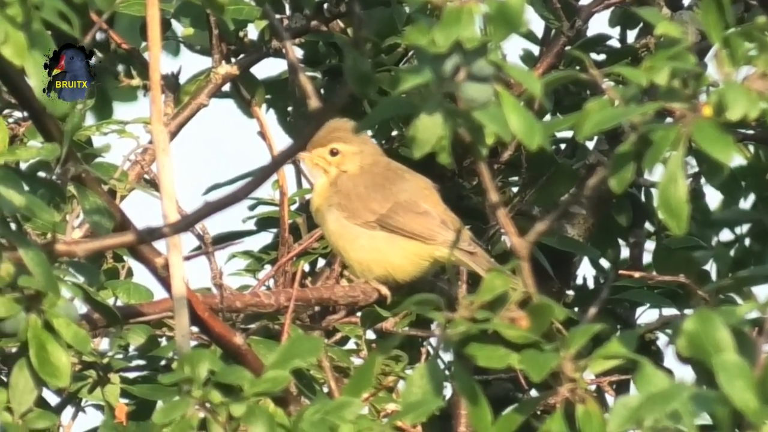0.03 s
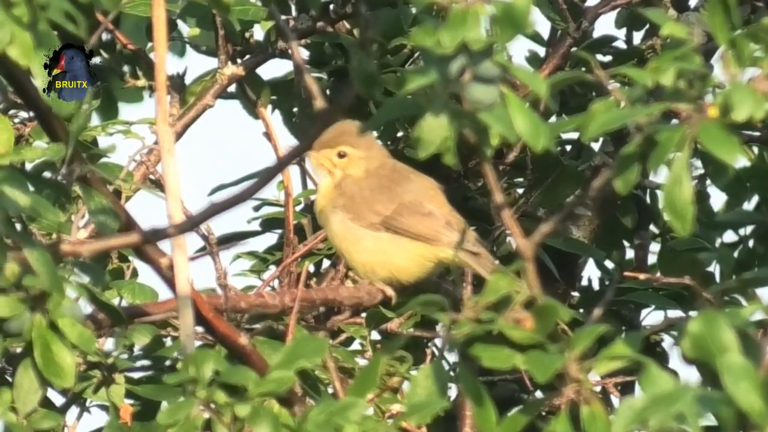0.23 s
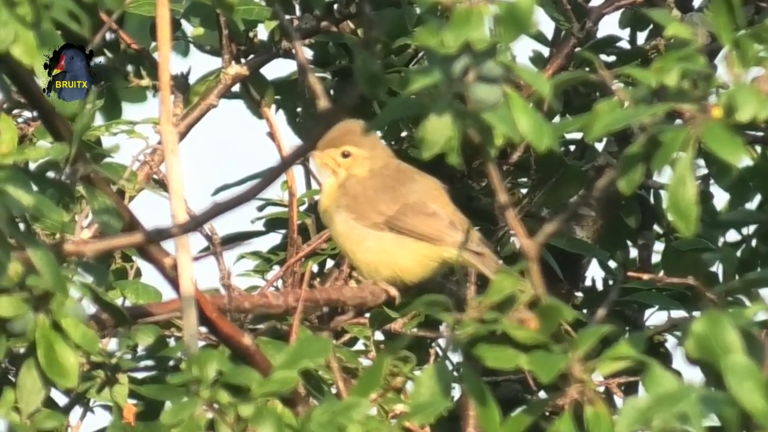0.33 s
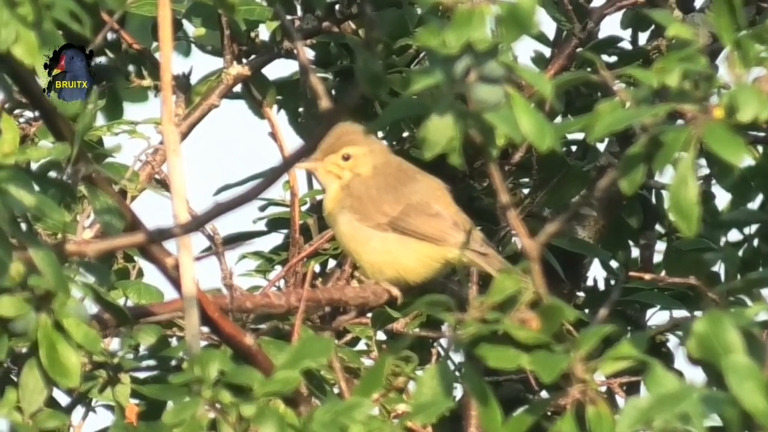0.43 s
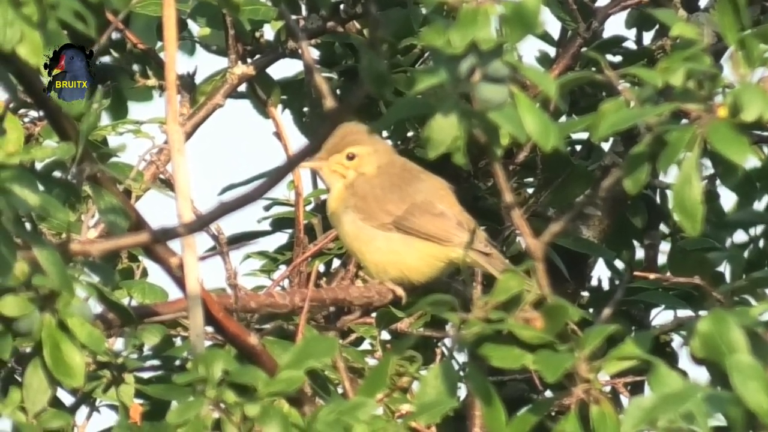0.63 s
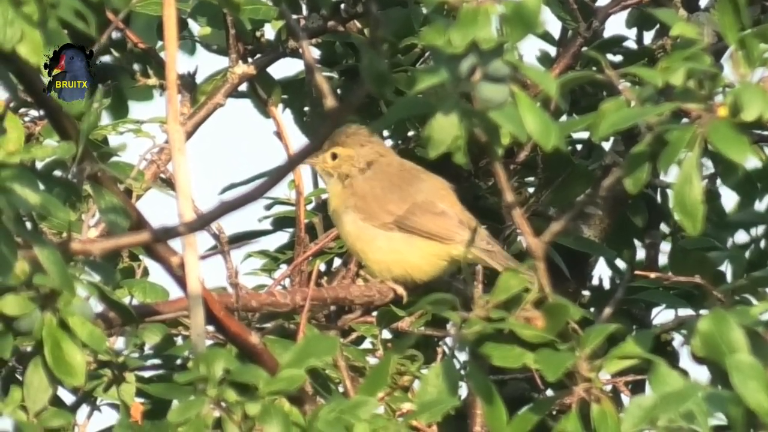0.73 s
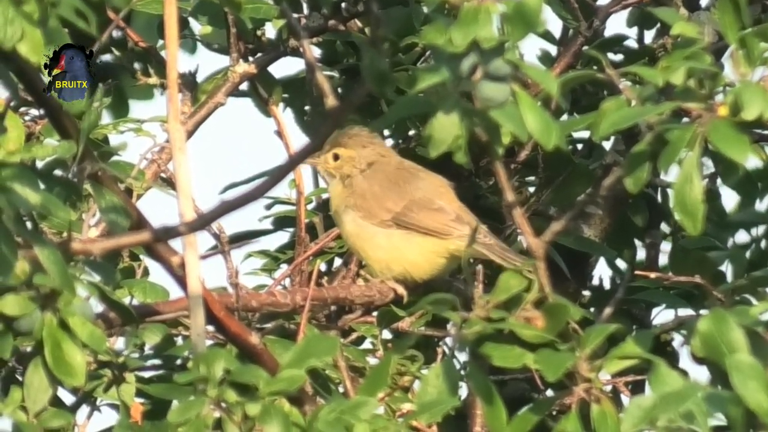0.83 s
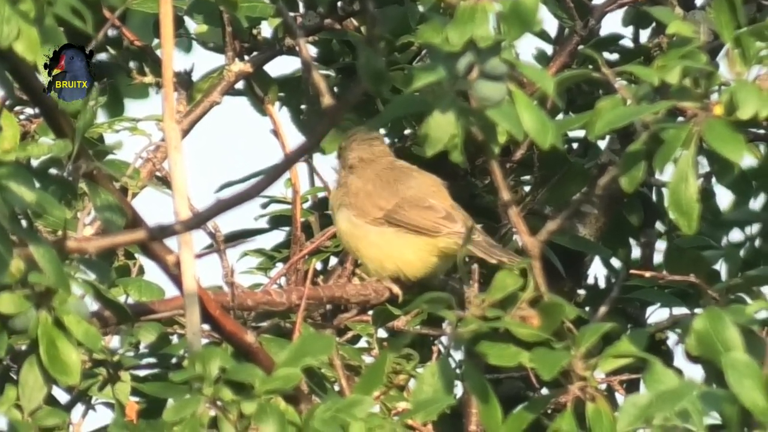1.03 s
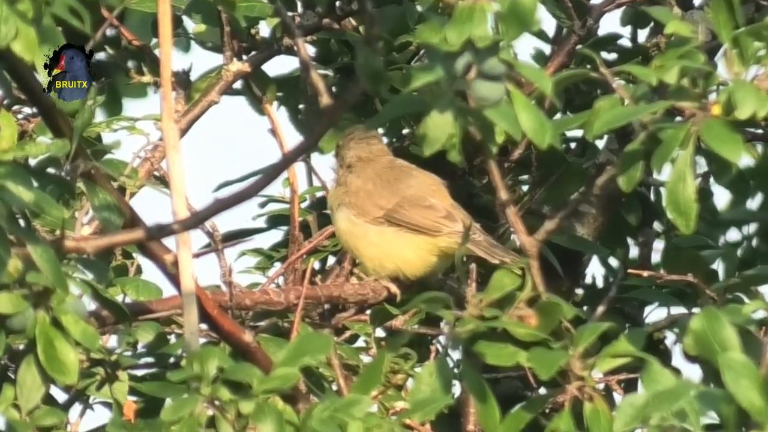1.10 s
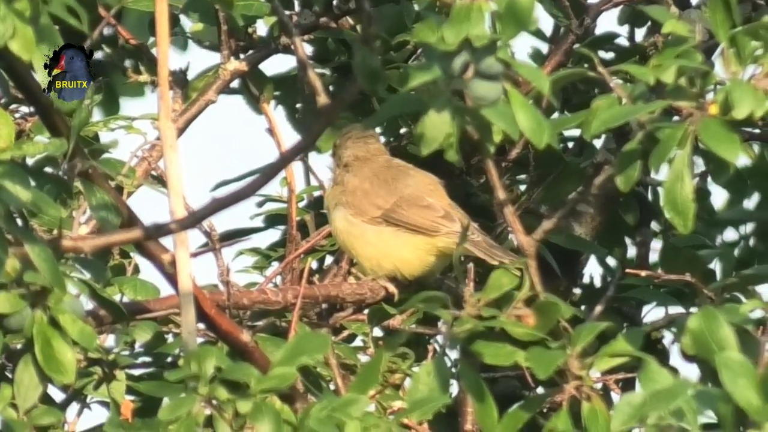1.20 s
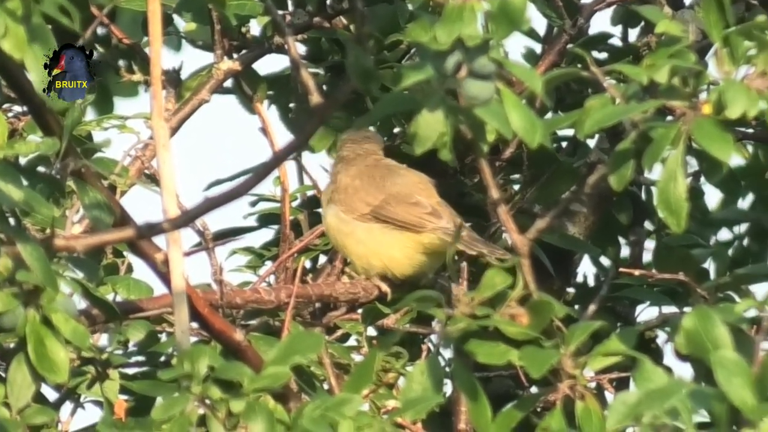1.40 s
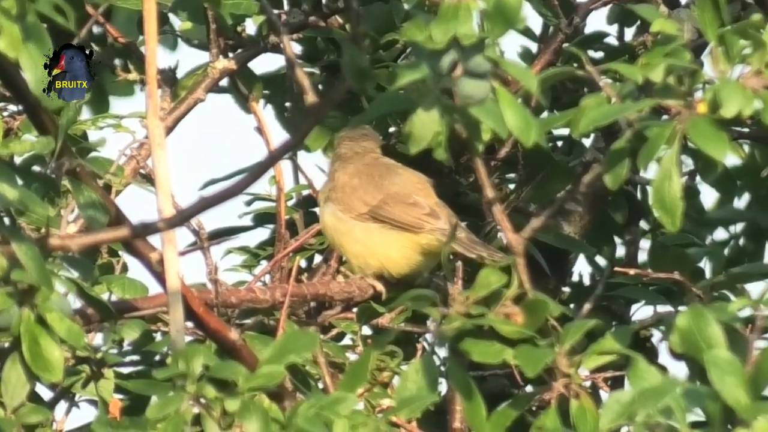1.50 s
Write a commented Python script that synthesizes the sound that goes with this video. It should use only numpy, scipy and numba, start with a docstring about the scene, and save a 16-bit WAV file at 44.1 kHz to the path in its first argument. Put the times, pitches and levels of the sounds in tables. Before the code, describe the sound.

A small warbler in a bush scolds with a dry, gradually slowing rattle over soft outdoor hush

```python
"""Far-off birds chirp over a steady outdoor hush; then a warbler in a bush scolds with a dry rattle
of fourteen short notes that gradually slow down. Both sides of its syrinx puff at once on clashing pitches
into a throat resonance that slides down through each note. The chirps are gliding sines, and foliage scatters
both birds. The hush is filtered noise, with narrow resonant drones and a low rumble that swells near the end."""
import sys
import numpy as np
from scipy import signal
from scipy.fft import rfft, irfft
from scipy.io import wavfile
from numba import njit

SR = 44100
rng = np.random.default_rng(int(sys.argv[2]) if len(sys.argv) > 2 else 0)


def materialize(psi):
    """Save the field psi as 16-bit PCM at rate SR to the path in sys.argv[1].

    A 1-D psi becomes a single channel; in a 2-D psi each row is a channel.
    """
    bounded = np.clip(np.atleast_2d(psi).T, -1, 1)
    quanta = np.round(bounded * 32767).astype(np.int16)
    wavfile.write(sys.argv[1], SR, quanta)


N = 68355  # samples in the scene


def from_db(db):
    """Level to amplitude ratio: 20 dB is a factor of ten."""
    return 10 ** (np.asarray(db) / 20)


def rms_one(x):
    """Normalisation to unit mean-square power."""
    return x / np.sqrt(np.mean(x ** 2) + 1e-20)


def coloured(x, spectrum):
    """Linear filtering: the spectrum is multiplied by a curve of (Hz, dB) points."""
    hz, db = np.transpose(spectrum)
    padded = 2 * len(x)  # room for the filter's ringing
    bins_hz = np.fft.rfftfreq(padded, 1 / SR)
    gain = from_db(np.interp(np.log(bins_hz + 1), np.log(hz), db))
    return irfft(rfft(x, padded) * gain)[:len(x)]


def noise(spectrum):
    """Filtered white noise of unit power, its spectral density shaped by the curve."""
    return rms_one(coloured(rng.standard_normal(N), spectrum))


def wobble(hz, size):
    """Low-pass random drift of unit power, slower than the given cutoff."""
    lowpass = signal.butter(2, hz, fs=SR, output="sos")
    return rms_one(signal.sosfilt(lowpass, rng.standard_normal(size)))


@njit
def resonate(x, centre, width):
    """Damped resonance with a movable centre: a two-pole recursion, in cycles per sample."""
    y = np.zeros(len(x))
    r = np.exp(-np.pi * width)  # decay per sample
    for i in range(2, len(x)):
        drive = (1 - r * r) / 2 * (x[i] - x[i - 2])
        y[i] = drive + 2 * r * np.cos(2 * np.pi * centre[i]) * y[i - 1] - r * r * y[i - 2]
    return y


def background():
    """Incoherent sources add in power: broadband hush, narrow-band drones and a swelling rumble."""
    # Outdoor hush. Each row: frequency in Hz, relative spectral density in dB per Hz.
    hush_colour = [(20, 3), (45, -3), (80, -8), (160, -10.5), (300, -11.5), (520, -9), (650, -5),
                   (1000, -2.5), (1500, -4.5), (2000, -10.5), (3200, -6), (4500, -11.5), (6500, -16.5),
                   (10000, -18.5), (15500, -26)]
    # Far-off drones. Each row: centre in Hz, width in Hz, level at the start in dB, level at the end in dB.
    drones = [(424, 67, -52.5, -53.5), (1622, 43, -64, -53), (1553, 6.8, -66.5, -52.5)]
    # Low rumble. Each row: frequency in Hz, relative spectral density in dB per Hz.
    rumble_colour = [(50, -12), (110, -3), (190, 3.5), (300, 0), (500, -2), (1000, -27), (2500, -40)]
    # Swell of the rumble. Each row: time in seconds, level in dB.
    rumble_level = [(0, -81), (.85, -64.5), (1.1, -50), (1.3, -56), (1.42, -48.5), (1.55, -45)]
    hush_db = -44.5
    out = from_db(hush_db) * noise(hush_colour)
    for hz, width_hz, start_db, end_db in drones:
        drone = resonate(rng.standard_normal(N), np.full(N, hz / SR), width_hz / SR)
        out = out + from_db(np.linspace(start_db, end_db, N)) * rms_one(drone)
    rumble_db = np.interp(np.arange(N) / SR, *np.transpose(rumble_level))
    return out + from_db(rumble_db) * noise(rumble_colour)


def far_birds():
    """Frequency modulation: thin whistles whose phase integrates a pitch curved through three points."""
    # Distant chirps. Each row: start in seconds, length in seconds, start pitch in Hz, middle pitch in Hz,
    # end pitch in Hz, level in dB (of the fundamental's power at mid-chirp).
    chirps = [(.001, 0.019, 3020, 2950, 3300, -45), (.028, 0.035, 2350, 2730, 2860, -47.5),
              (.063, 0.019, 3070, 2630, 1960, -44), (.118, .022, 4190, 3800, 3170, -48),
              (0.141, 0.023, 2750, 2503, 1950, -44.5), (.163, .03, 3510, 3300, 3030, -48.5),
              (.268, 0.033, 2830, 3110, 3100, -45), (.323, 0.033, 2940, 2700, 2120, -42.5),
              (.69, 0.054, 3110, 3470, 3480, -51), (.89, 0.021, 3000, 3370, 3640, -48),
              (.97, 0.051, 2950, 2800, 3170, -49), (1.16, 0.018, 3550, 3370, 2500, -47),
              (1.322, .025, 2780, 3200, 4050, -49), (1.39, .035, 2440, 2350, 1680, -47),
              (1.494, .064, 2397, 3104, 2500, -44)]
    overtone_db = -24  # second harmonic re the fundamental
    out = np.zeros(N + SR)
    for s, length, start_hz, middle_hz, end_hz, db in chirps:
        along = np.linspace(0, 1, int(length * SR))
        parabola = np.polyfit([0, .5, 1], [start_hz, middle_hz, end_hz], 2)
        phase = 2 * np.pi * np.cumsum(np.polyval(parabola, along)) / SR
        whistle = np.sin(phase) + from_db(overtone_db) * np.sin(2 * phase)
        swell = np.sqrt(2) * np.sin(np.pi * along)
        start = max(int(s * SR), 0)
        out[start:start + len(along)] += from_db(db) * swell * whistle
    return out[:N]


def scatter(x, t60, gap):
    """Diffuse scattering: convolution with exponentially decaying noise of unit energy, after a gap (s)."""
    t = np.arange(min(len(x), SR // 2)) / SR
    echoes = rng.standard_normal(len(t)) * from_db(-60 * t / t60) * (t > gap)
    return signal.fftconvolve(x, echoes / np.linalg.norm(echoes))[:len(x)]


def cycles(pitch_hz, jitter):
    """Phase is the integral of frequency; jitter (rms radians) makes one syrinx side's cycles uneven."""
    jitter_hz = 700  # cutoff of the drift
    turns = np.cumsum(pitch_hz) / SR + rng.random()
    return 2 * np.pi * turns + jitter * wobble(jitter_hz, len(pitch_hz))


def puffs(phase, other):
    """Coupled pulsing: one narrow air puff per cycle, pushed early or late by the other side's phase."""
    sharpness, coupling_db = 10.3, -7.5  # coupling: timing push in dB re one radian
    pushed = phase + from_db(coupling_db) * np.sin(other)
    return np.exp(sharpness * (np.cos(pushed) - 1))


def evened(x):
    """Short-term power normalisation: division by a running rms under a bell-shaped window."""
    steady_s = 0.0066  # two standard deviations of the bell
    window = np.exp(-.5 * (np.arange(-300, 301) / (SR * steady_s / 2)) ** 2)
    power = np.convolve(x ** 2, window / window.sum(), "same")
    return x / np.sqrt(power + 1e-12)


def syrinx(along, high_phase, low_phase):
    """Source flow: two puff trains share one air supply, so each starves the other when both open."""
    low_voice_db, shared_air, breath_db = 0, 0.25, -26  # breath: noise re the flow
    high_puffs = puffs(high_phase, low_phase)
    low_puffs = from_db(low_voice_db) * puffs(low_phase, high_phase)
    flow = high_puffs + low_puffs - shared_air * high_puffs * low_puffs
    return flow * (1 + from_db(breath_db) * rng.standard_normal(len(along)))


def vocal_tract(flow, along):
    """Source-filter principle: sliding throat and brief onset resonances, then windpipe and beak, colour flow."""
    # Fixed colour of windpipe and beak. Each row: frequency in Hz, gain in dB.
    beak_colour = [(600, -31), (1100, -12), (1500, -9), (1900, -12), (2300, -7), (3000, -4), (4000, 0),
                   (4900, -1), (5900, 2), (7000, -4), (8500, -12), (12000, -20)]
    throat_start_hz, throat_end_hz, throat_width_hz, bypass_db = 4000, 3010, 1770, -8
    ring_hz, ring_width_hz, ring_db, ring_share = 3840, 170, 2.5, 0.22  # share of the note
    throat_hz = throat_start_hz + (throat_end_hz - throat_start_hz) * np.maximum(along, 0)
    throat = resonate(flow, throat_hz / SR, throat_width_hz / SR) + from_db(bypass_db) * flow
    onset_push = from_db(ring_db) * np.exp(-(along / ring_share) ** 2)
    onset_ring = resonate(flow * onset_push, np.full(len(flow), ring_hz / SR), ring_width_hz / SR)
    return coloured(throat + onset_ring, beak_colour)


def note(t, length, high_hz, low_hz, arch_depth, octave_db):
    """Superposition of a rasp from two arching, coupled voices and a smooth core of pure partials."""
    arch_top, sag_from, sag = .54, 0.81, .2  # shares of the note; sag: share of pitch per note length
    high_jitter, low_jitter = .16, .2  # radians
    twigs_db, twigs_t60_s = -12, .007  # quick scatter from the twigs right by the bird
    octave_peak, octave_spread = .64, .27  # where the high voice's octave rings clear: shares of the note
    clear_high_db, clear_low_octave_db = -25, -20.5  # peak level re the rasp's rms
    attack_s, release_s, fade_db = 0.0021, 0.0037, -1.5  # softness of the edges; change along the note

    along = np.clip(t / length, -.3, 1.3)
    # the pitch arches, and sags further as the breath runs out
    arch = 1 - arch_depth * (along - arch_top) ** 2 - sag * np.maximum(along - sag_from, 0)
    high_phase = cycles(high_hz * arch, high_jitter)
    low_phase = cycles(low_hz * arch, low_jitter)
    voice = vocal_tract(syrinx(along, high_phase, low_phase), along)
    rasp = evened(voice + from_db(twigs_db) * scatter(voice, twigs_t60_s, 0))

    octave_swell = from_db(octave_db) * np.exp(-((along - octave_peak) / octave_spread) ** 2)
    octave = octave_swell * np.cos(2 * high_phase)
    core = from_db(clear_high_db) * np.cos(high_phase) + from_db(clear_low_octave_db) * np.cos(2 * low_phase)
    opening = 1 / (1 + np.exp(-t / attack_s)) / (1 + np.exp((t - length) / release_s))
    return evened(rasp + octave + core) * opening * from_db(fade_db * (along - 1.0))


def rattle():
    """Repetition rate sets the rhythm: the near bird's notes are placed at widening intervals."""
    # Rattle notes. Each row: start in seconds, length in seconds, level in dB (before fade and soft edges),
    # top pitch of the high voice in Hz, top pitch of the low voice in Hz, depth of the pitch arch
    # (share of pitch per squared note length), peak of the clear octave in dB re the rasp's rms.
    rattle_notes = [(.236, 0.025, -26.5, 1339, 1074, 0.31, -34), (.292, .028, -24.5, 1423, 1131, .45, -12),
                    (0.347, .033, -24, 1504, 1177, .5, -18), (0.415, 0.03, -24, 1475, 1150, 0.29, -8),
                    (0.484, 0.033, -23.5, 1504, 1158, 0.64, -18), (.554, .036, -23.5, 1511, 1206, 0.43, -6),
                    (.641, 0.034, -23.5, 1530, 1154, 0.43, -13), (.744, 0.04, -24, 1456, 1134, 0.32, -5),
                    (.820, 0.039, -23.5, 1571, 1171, .6, -5.5), (.919, .038, -24, 1486, 1163, 0.37, -5.5),
                    (1.017, .040, -24, 1527, 1195, 0.44, -4), (1.117, 0.037, -25.5, 1453, 1140, 0.44, -14),
                    (1.216, .037, -24.5, 1464, 1165, 0.2, -4), (1.348, 0.039, -26.5, 1378, 1091, 0.37, -30)]
    out = np.zeros(N + SR)
    lead = SR // 50  # samples ahead of each start, for the soft edge
    t = np.arange(-lead, 4 * lead) / SR
    for s, length, db, *voicing in rattle_notes:
        start = int(s * SR) - lead
        out[start:start + len(t)] += from_db(db) * note(t, length, *voicing)
    return out[:N]


def scene():
    """Mid-side stereo: everything sits in the centre, and only a hiss of opposite polarity is wide."""
    # Hiss that differs between the ears. Each row: frequency in Hz, relative spectral density in dB per Hz.
    hiss_colour = [(200, -36), (500, -16), (2000, -29), (4000, -12.5), (7000, 1), (10000, -0.5),
                   (15500, -7.5)]
    hiss_db = -59
    leaves_db, chirp_wet_db = -17, -8  # how much of each bird the foliage scatters
    leaves_t60_s, leaves_gap_s = 0.14, 0.0044
    near, far = rattle(), far_birds()
    into_leaves = from_db(leaves_db) * near + from_db(chirp_wet_db) * far
    leaves = scatter(into_leaves, leaves_t60_s, leaves_gap_s)
    centre = near + far + leaves + background()
    side = from_db(hiss_db) * noise(hiss_colour)
    return np.array([centre + side, centre - side])


def record(dry):
    """Band limiting: a steep elliptic low-pass removes the top."""
    cutoff_hz = 15750
    lowpass = signal.ellip(12, .1, 80, cutoff_hz, fs=SR, output="sos")
    return signal.sosfilt(lowpass, dry)


dry = scene()
out = record(dry)
materialize(out)
```